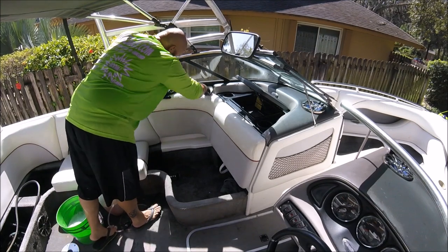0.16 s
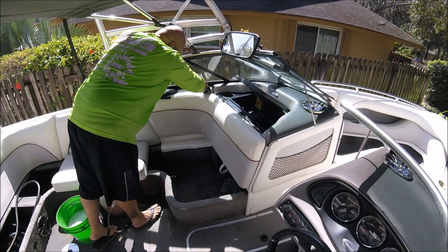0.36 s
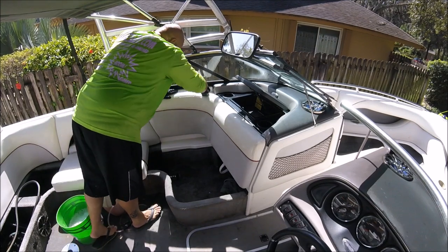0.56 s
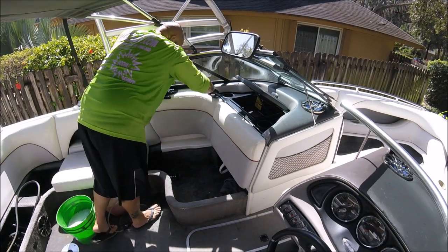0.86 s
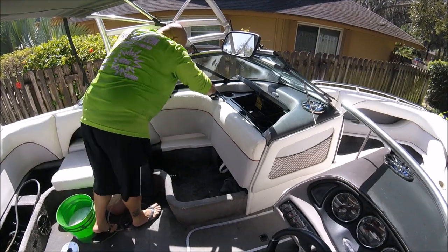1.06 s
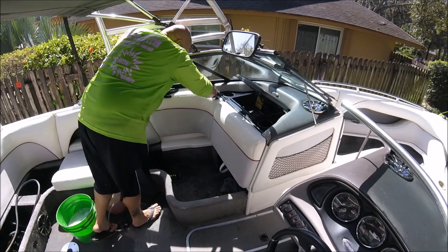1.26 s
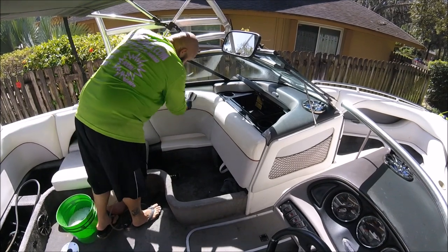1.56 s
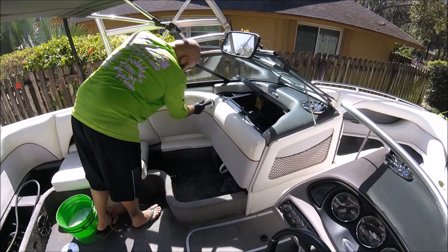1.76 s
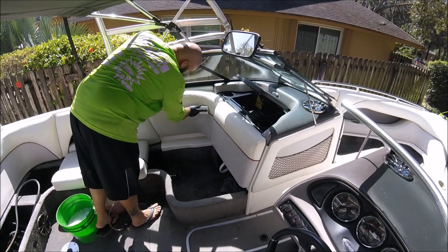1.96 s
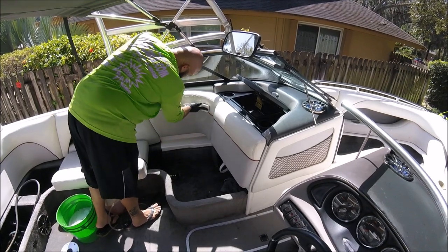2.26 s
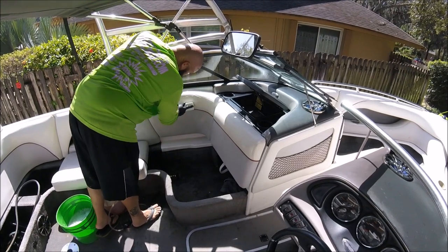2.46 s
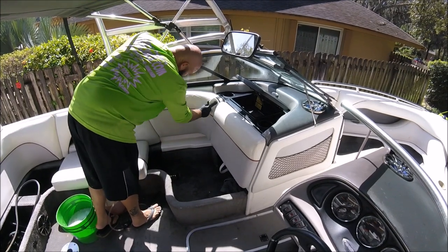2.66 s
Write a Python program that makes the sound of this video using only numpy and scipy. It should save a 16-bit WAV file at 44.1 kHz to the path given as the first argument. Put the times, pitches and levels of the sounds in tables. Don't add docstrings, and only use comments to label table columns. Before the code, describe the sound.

Quick raspy brush scrubbing on wet vinyl, with hollow knocks and taps over low wind rumble

```python
import sys
import numpy as np
from scipy import signal
from scipy.fft import rfft, irfft, next_fast_len
from scipy.io import wavfile
from scipy.ndimage import uniform_filter1d

SR = 44100
rng = np.random.default_rng(int(sys.argv[2]) if len(sys.argv) > 2 else 0)


def unload_wav(signal):
    wavfile.write(
        sys.argv[1],
        SR,
        np.round(np.clip(np.atleast_2d(signal).T, -1, 1) * 32767).astype(np.int16),
    )


def invert_db(level):
    return 10 ** (np.asarray(level, dtype=float) / 20)


N = 123479


def evened(x):
    return x / np.sqrt(np.mean(x ** 2) + 1e-20)


def colour(x, points):
    f, db = np.transpose(points)
    size = next_fast_len(len(x))
    hz = np.fft.rfftfreq(size, 1 / SR)
    gain_db = np.interp(np.log(hz + 1), np.log(f + 1), db, left=-60)
    return irfft(rfft(x, size) * invert_db(gain_db), size)[:len(x)]


def add(mix, s, sound):
    at = round(s * SR)
    part = mix[max(at, 0):][:len(sound) + min(at, 0)]
    part += sound[max(-at, 0):][:len(part)]


def resonate(x, hz, width):
    turn = np.exp(2j * np.pi * np.cumsum(hz * np.ones(len(x))) / SR)
    r = np.exp(-np.pi * width / SR)
    return 2 * (turn * signal.lfilter([1 - r], [1, -r], x / turn)).real


def band(x, hz, width):
    for _ in range(3):
        x = resonate(x, hz, width)
    return evened(x)


def wander(per_s):
    return evened(signal.lfilter(*signal.butter(2, per_s, fs=SR), rng.standard_normal(N)))


def ring(modes, t, chance):
    out = 0
    for (hz, db, t60), c in zip(modes, chance):
        out = out + invert_db(db + 5.1 * c - 60 * t / t60) * np.sin(2 * np.pi * hz * (1 + 0.019 * c) * t)
    return out


# (start [s], fastest [s], end [s], level [dB], bristle pitch [Hz])
STROKES = [(-.05, 0.009, 0.039, -29.5, 3010), (0.067, 0.087, 0.15, -32.5, 2910),
           (0.189, 0.252, .3, -29.5, 2920), (0.287, 0.344, .4, -32, 1940), (0.415, 0.45, 0.53, -36.5, 2290),
           (.56, 0.603, 0.72, -40.5, 2400), (0.61, 0.662, 0.73, -44.5, 3080),
           (0.731, 0.781, 0.83, -35.5, 2600), (0.901, 0.911, 1.2, -34, 1760),
           (0.918, 1.001, 1.071, -32.5, 3120), (1.134, 1.141, 1.446, -42, 3040),
           (1.175, 1.244, 1.26, -30.5, 2600), (1.329, 1.392, 1.464, -34.5, 2830),
           (1.548, 1.634, 1.697, -29.5, 3940), (1.72, 1.802, 1.855, -27, 3840),
           (1.856, 1.929, 2.015, -28, 3700), (2.018, 2.074, 2.136, -27.5, 3470),
           (2.145, 2.185, 2.305, -29, 2720), (2.305, 2.359, 2.452, -29, 3200),
           (2.441, 2.472, 2.58, -27, 3080), (2.718, 2.723, 2.81, -33, 1950)]
# (pitch [Hz], level [dB per Hz])
FIZZ = [(500, -64), (1100, -25.5), (2500, -8), (4000, -5.5), (5600, -9), (7400, -16.5), (11000, -28),
        (13500, -38)]
# (pitch [Hz], level [dB per Hz])
RASP = [(400, -53), (800, -8), (1500, -2), (2300, -2), (4000, -11), (8000, -40)]
TICKS_PER_S, TICK_SPREAD_DB = 16000, 1.5
POINTED, ARCH_POWER = 0.66, 0.81
SLOW_PITCH, TIRED_PITCH = 0.433, 0.86
EDGE_DB, FIZZ_EDGE_DB, RASP_EDGE_DB = -23.5, -26, -4
FIZZ_POWER, BRIGHT_POWER = 0.74, 2.04
CLUMP_DB, FIZZ_CLUMP_DB = 1.6, 1.0
HUMP_DB, FIZZ_DB, RASP_DB = -8.5, -4, -11
SQUEAK_DB, SQUEAK_WIDTH_HZ, SQUEAK_DRIFT = -6, 260, .12
TAPER_S = .012


def brush():
    lead_in = .5
    ticks = rng.standard_normal(N + SR) * invert_db(TICK_SPREAD_DB * np.minimum(rng.exponential(1, N + SR), 4))
    ticks = evened(ticks * (rng.random(N + SR) < TICKS_PER_S / SR))
    fizz = evened(colour(ticks, FIZZ))
    rasp = evened(colour(ticks[::-1], RASP))
    drift = np.tile(wander(19.7), 2)
    lumps = np.resize(wander(110), len(fizz))
    clump = invert_db(CLUMP_DB * lumps)
    fizz = fizz * invert_db(FIZZ_CLUMP_DB * lumps[::-1])
    out = np.zeros(N)
    for start, top, end, db, hz in STROKES:
        t = np.arange(start, end, 1 / SR)
        first = round((start + lead_in) * SR)
        part = slice(first, first + len(t))
        ramp = np.interp(t, [start, top, end], [0, 1, 0])
        arch = np.sin(np.pi / 2 * ramp)
        speed = (POINTED * ramp + (1 - POINTED) * arch) ** ARCH_POWER
        tiring = np.interp(t, [start, end], [2 - TIRED_PITCH, TIRED_PITCH])
        pitch = hz * (SLOW_PITCH + (1 - SLOW_PITCH) * speed) * tiring
        squeak_hz = pitch * np.exp(SQUEAK_DRIFT * drift[part])
        squeak = band(rasp[part] + fizz[part], squeak_hz, SQUEAK_WIDTH_HZ)
        hump = band(ticks[part], pitch, hz) + invert_db(SQUEAK_DB) * squeak
        hump = hump * clump[part] * invert_db(EDGE_DB * (1 - speed) + HUMP_DB)
        tips = fizz[part] * invert_db(FIZZ_EDGE_DB * (1 - arch ** FIZZ_POWER) + FIZZ_DB)
        tips = tips * (hz / 3400) ** BRIGHT_POWER
        drag = invert_db(RASP_DB + RASP_EDGE_DB * (1 - speed)) * rasp[part]
        taper = np.clip(np.minimum(t - start, end - t) / TAPER_S, 0, 1)
        add(out, start, taper * invert_db(db - 0.5) * (tips + hump + drag))
    return out


# (pitch [Hz], level [dB per Hz])
WIND = [(12, -10), (22, -5.5), (75, 2), (125, -9), (170, -3), (230, -15), (334, -17), (600, -17.5)]
# (time [s], level [dB])
BREEZE = [(0, 5), (.1, 3.5), (0.169, -1), (.3, 2), (.6, 3.5), (.75, 0), (.95, 3.5), (1.1, 4), (1.3, 2.5),
          (1.55, -2.5), (1.65, -1.5), (1.75, 4.5), (1.899, -0.5), (2.1, 5), (2.35, -7), (2.5, -4.5),
          (2.65, -5), (2.8, 1.5)]
# (pitch [Hz], level [dB per Hz])
YARD = [(180, -56), (300, -12), (650, -14), (1300, -13), (3500, -13), (6500, -19.5), (9000, -26),
        (14000, -44)]
WIND_DB, GUST_DB, YARD_DB = -43.5, 3, -49


def air():
    breeze_db = np.interp(np.arange(N) / SR, *np.transpose(BREEZE))
    rumble = colour(rng.standard_normal(N), WIND + [(900, -82)])
    wind = evened(rumble * invert_db(GUST_DB * wander(7.0)))
    yard = evened(colour(rng.standard_normal(N), YARD) * invert_db(0.76 * wander(4.5)))
    return invert_db(WIND_DB + breeze_db) * wind + invert_db(YARD_DB) * yard


# (time [s], level [dB], ring pitch [Hz],
# t60 [ms])
TAPS = [(.077, -42, 1110, 19), (.2815, -22.5, 625, 24), (.285, -30, 860, 30), (0.3, -24, 188, 57),
        (0.317, -30.5, 334, 79), (.494, -26, 169, 64), (.524, -27, 159, 60), (.552, -30, 140, 50),
        (0.596, -34, 150, 40), (0.8228, -13, 540, 13), (0.826, -32, 3070, 13), (0.825, -37, 4750, 15),
        (.831, -35, 2680, 15), (.835, -39, 3700, 10), (.829, -15.5, 480, 24), (.863, -25.5, 706, 23),
        (0.9146, -28, 1690, 17), (0.921, -34, 1240, 25), (0.926, -31, 830, 28), (.931, -32.5, 1400, 27),
        (0.94, -33, 1490, 40), (.952, -31, 1500, 20), (1.011, -35.5, 377, 53), (1.022, -35, 316, 34),
        (1.028, -26.5, 965, 23), (1.033, -32, 520, 27), (1.051, -31, 426, 27), (1.0395, -20.5, 725, 28),
        (1.044, -19, 200, 24), (1.044, -25.5, 925, 26), (1.052, -27, 150, 30), (1.06, -24, 570, 14),
        (1.0635, -18.5, 630, 27), (1.0707, -12, 168, 37), (1.0741, -33, 430, 21), (1.082, -46, 580, 13),
        (1.094, -38, 614, 17), (1.259, -33, 630, 15), (1.271, -29.5, 200, 95), (1.72, -37, 123, 25),
        (1.738, -41, 736, 73), (2.153, -39, 90.5, 31), (2.541, -36, 1426, 47), (2.729, -41, 1110, 35)]


def taps():
    rise_s = 0.0013
    out, t = np.zeros(N), np.arange(SR // 10) / SR
    for s, db, hz, t60_ms in TAPS:
        fade = invert_db(db - 60 * t / (t60_ms / 1000)) * (1 - np.exp(-t / rise_s))
        add(out, s, fade * 2 * np.sin(2 * np.pi * hz * t))
    return out


# (time [s], level [dB], pitch [Hz])
BUMPS = [(0.201, -30.5, 60.5), (.37, -32, 44.7), (1.031, -22, 60), (1.068, -23, 130), (1.189, -38, 50),
         (2.79, -37, 150), (.66, -38, 152), (1.852, -32.5, 78.72), (1.987, -30, 56.3), (2.049, -31, 44.3),
         (2.173, -24.5, 100)]


def bumps():
    swell_s = 0.0052
    out, t = np.zeros(N), np.arange(SR // 4) / SR
    for s, db, hz in BUMPS:
        swell = t / swell_s * np.exp(1 - t / swell_s)
        add(out, s, invert_db(db) * swell * np.sin(2 * np.pi * hz * t))
    return out


# (time [s], level [dB], panel pitch [Hz], swell [ms], crack level [dB])
KNOCKS = [(.281, -12.5, 344.7, 6.1, -30.5), (0.4753, -7, 361, 2.85, -18.5), (0.7973, -20, 395, 1.2, -50),
          (0.8228, -17.5, 481, 5.9, -10.5), (.836, -13.5, 400, 1.24, -58), (0.917, -27.5, 401, 6.8, -27.5),
          (1.027, -30.5, 297, 3.6, -35), (1.039, -23, 450, 1.2, -43), (1.059, -22, 452, 5.8, -53),
          (1.0684, -10.5, 455, 2.94, -29.5), (1.259, -16.5, 353, 5.5, -32)]
# (pitch [Hz], level [dB], t60 [s])
HULL = [(51.4, -26, 0.51), (100, -19.5, 0.21), (168.6, -9.5, 0.12), (226, -10.5, 0.055)]
# (pitch [Hz], level [dB], t60 [s])
RIM = [(501.4, -5.5, 0.058), (633, -11, 0.034), (864, -5.5, 0.017)]
# (pitch [Hz], level [dB], t60 [s])
BLOCK = [(724, -3.5, 0.075), (989, 3, 0.031), (1110, -1, 0.044), (1120, -2, 0.015), (1672, -7, 0.036),
         (2146, -9, 0.034), (2625, -12.5, 0.053)]
# (pitch [Hz], width [Hz], level [dB], t60 [s])
CLATTER = [(983, 610, -1, 0.078), (1530, 950, -7, 0.093), (2600, 1200, -9, 0.051),
           (4550, 2000, -15.5, 0.021)]
BOOM_DB, BOOM_T60, BOOM_HZ, BOOM_RISE_S = -18, 0.3, 307, .01
SINK_HZ, SINK_S, SINK_DB, SINK_T60 = 150, 0.047, -15.5, 0.14
OVERTONE, OVERTONE_DB, SOFT_DB_PER_MS = 1.5, -19.5, -1
HARD_TILT = 0.5


def knocks():
    out, t = np.zeros(N), np.arange(SR // 4) / SR
    chance = rng.uniform(-0.83, 1, (len(KNOCKS), 20))
    noise = rng.standard_normal((len(KNOCKS), len(t)))
    low = signal.butter(2, BOOM_HZ, fs=SR)
    for (s, db, hz, swell_ms, crack_db), c, n in zip(KNOCKS, chance, noise):
        u = t / (swell_ms / 1000)
        rise = 1 - np.exp(-u)
        panel = u * np.exp(.5 - .5 * u ** 1.86) * -np.sin(2 * np.pi * hz * t * (1 - 0.75 * t))
        overtone = invert_db(OVERTONE_DB) * u * np.exp(1 - u) * np.sin(2 * np.pi * OVERTONE * hz * t)
        rim = overtone + ring(RIM, t, c[len(HULL):]) * rise
        panel = panel + invert_db(SOFT_DB_PER_MS * (swell_ms - 2.0)) * rim
        boom = evened(signal.lfilter(*low, n)) * (1 - np.exp(-t / BOOM_RISE_S))
        boom = boom * invert_db(BOOM_DB - 60 * t / BOOM_T60)
        sink = band(n, SINK_HZ + (hz - SINK_HZ) * np.exp(-t / SINK_S), 96)
        sink = sink * (1 - np.exp(-u / 2)) * invert_db(SINK_DB - 60 * t / SINK_T60)
        hull = sink + ring(HULL, t, c) * rise
        hardness = HARD_TILT * min(crack_db - db, 2)
        clatter = 0
        for f, width, d, t60 in CLATTER:
            fade = invert_db(d + hardness * np.log2(f / 1000) - 60 * t / t60)
            clatter = clatter + band(n[::-1], f, width) * fade
        rattle = (ring(BLOCK, t, c[::-1]) + clatter) * np.minimum(t / 0.00059, 1)
        add(out, s, invert_db(db) * (panel + boom + hull) + invert_db(crack_db - 7.0) * rattle)
    return out


def cockpit(x):
    t = np.arange(0, .2, 1 / SR)
    echoes = rng.standard_normal(len(t)) * (rng.random(len(t)) < .05)
    echoes = echoes * invert_db(-60 * t / 0.097) * (t > .003)
    return signal.fftconvolve(x, echoes / np.linalg.norm(echoes))[:N]


def scene():
    near = brush() + taps() + bumps() + knocks()
    return (near + invert_db(-9.5) * cockpit(near) + air())[None]


# (pitch [Hz], width [Hz], level [dB])
HOUSING = [(2950, 380, 4), (3870, 254, 5.5), (6444, 480, 11.5), (11340, 940, 9)]


def housing(x):
    size = next_fast_len(N)
    hz = np.fft.rfftfreq(size, 1 / SR)
    lift_db = -12 * np.clip((hz - 13160) / 500, 0, 6)
    for f, width, db in HOUSING:
        lift_db = lift_db + db / (1 + ((hz - f) / (width / 2)) ** 2)
    return irfft(rfft(x, size) * invert_db(lift_db), size)[:, :N]


# (time [s], length [s], lowest pitch lost [Hz], level [dB])
DROPOUTS = [
    (.339, .02, 550, -19),
    (.339, .014, 2900, -30),
    (.637, .016, 300, -16),
    (.847, .015, 2300, -60),
    (1.169, .02, 1800, -12),
    (1.361, .012, 2000, -16),
    (1.532, .018, 300, -17),
    (1.706, .018, 400, -15),
    (2.64, .022, 550, -19),
]


def dropouts(x):
    size = next_fast_len(N)
    hz, t = np.fft.rfftfreq(size, 1 / SR), np.arange(N) / SR
    for s, length, above_hz, db in DROPOUTS:
        strands = np.cos(2 * np.pi * (hz / 800 + rng.random())) > .7
        spared = strands & (hz < 7000) & (db > -20)
        lost = irfft(rfft(x, size) * (hz > above_hz) * ~spared, size)[:, :N]
        x = x - lost * (1 - invert_db(db)) * np.exp(-((t - s) / (length / 2)) ** 6)
    return x


def thinned(x):
    low_hz, full_hz, share = 5660, 13100, 1.25
    hz, _, z = signal.stft(x, SR, nperseg=2048, noverlap=1024)
    power = uniform_filter1d(abs(z) ** 2, size=5, axis=1)
    nearby = uniform_filter1d(power, size=41, axis=1)
    edge = share * np.clip((hz[:, None] - low_hz) / (full_hz - low_hz), 0, 1) * nearby
    keep = np.clip(4 * (power / (edge + 1e-20) - 1) + .5, 0, 1)
    return signal.istft(z * keep, SR, nperseg=2048, noverlap=1024)[1][:, :N]


def roll_off(x):
    return signal.sosfilt(signal.butter(12, 14130, fs=SR, output="sos"), x)


def record(dry):
    mix = thinned(dropouts(housing(dry)))
    return roll_off(mix)


dry = scene()
out = record(dry)
unload_wav(out)
```